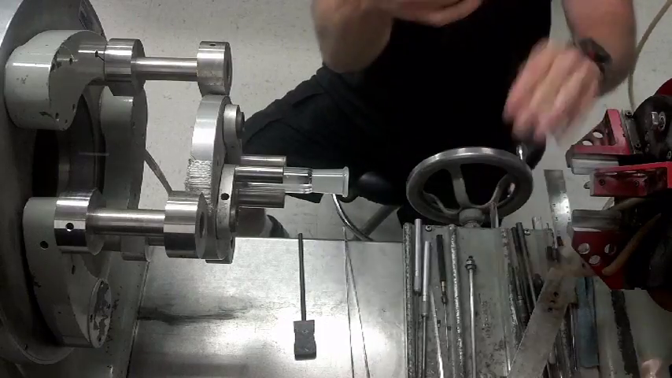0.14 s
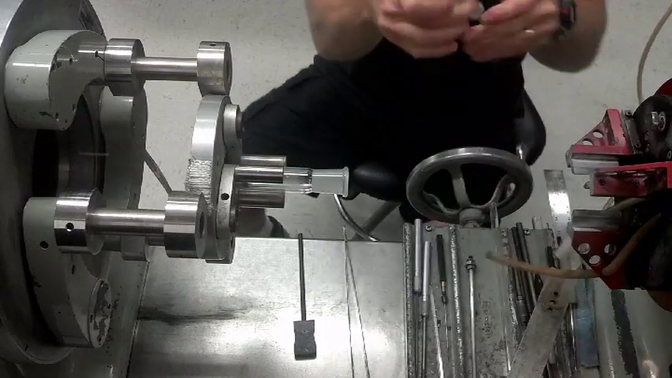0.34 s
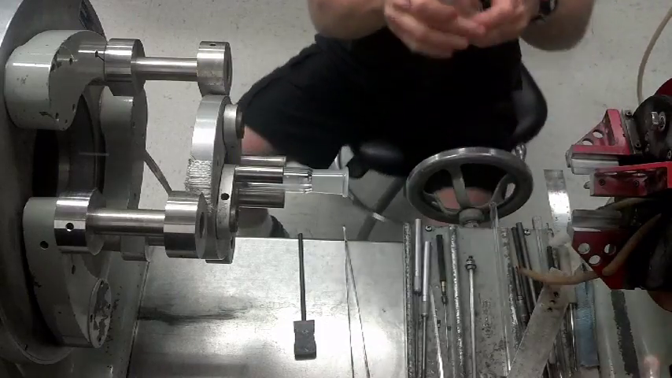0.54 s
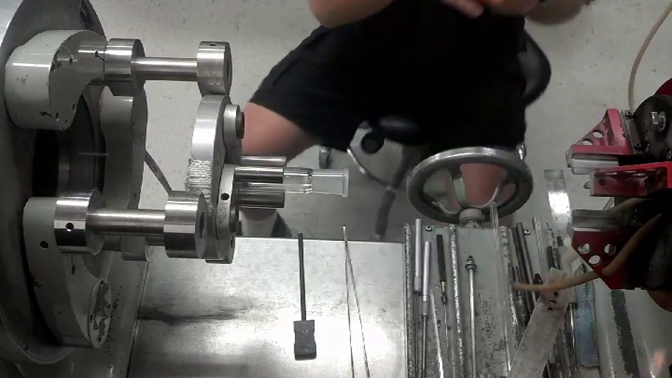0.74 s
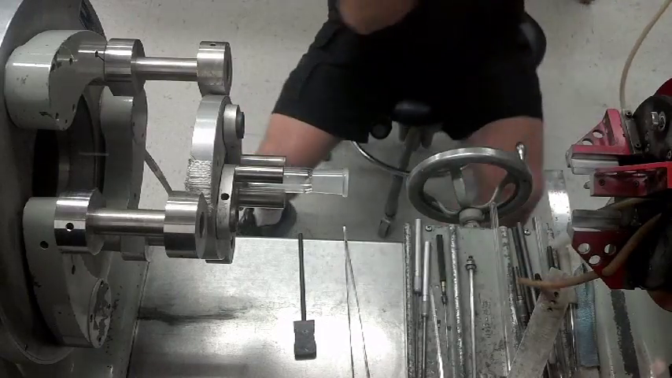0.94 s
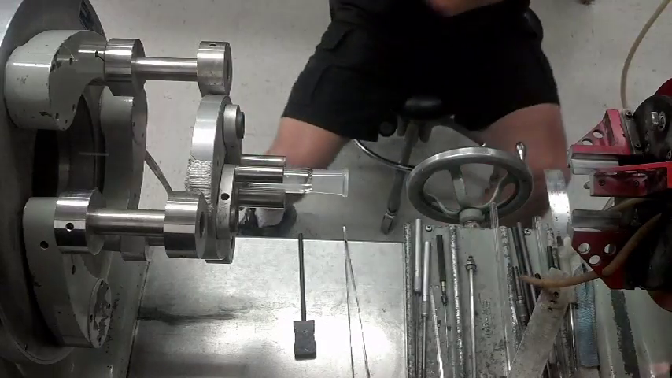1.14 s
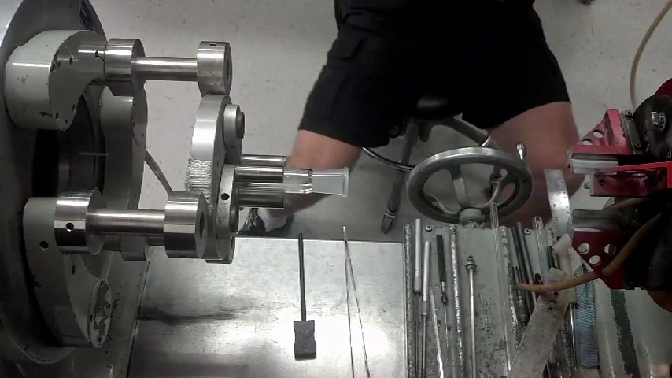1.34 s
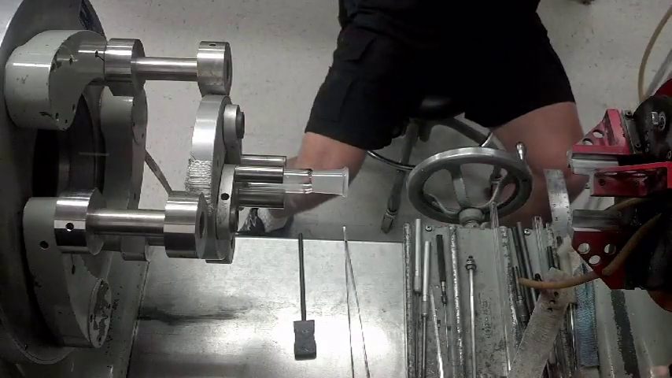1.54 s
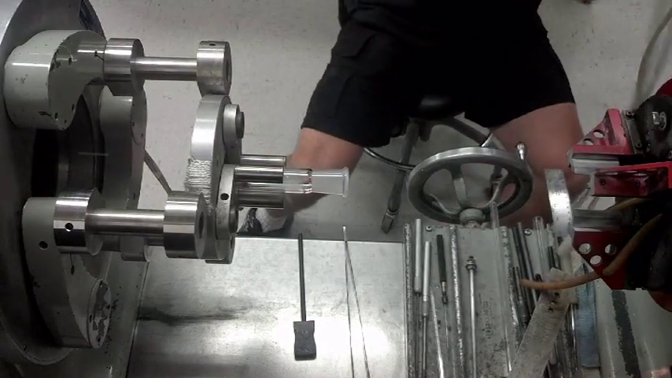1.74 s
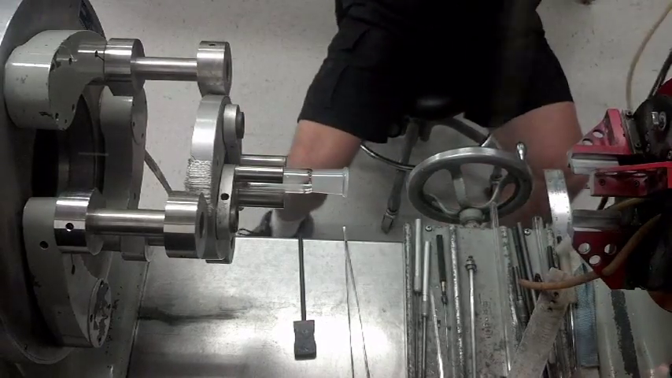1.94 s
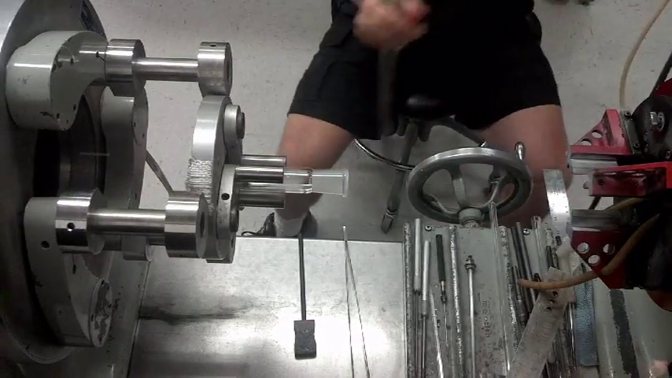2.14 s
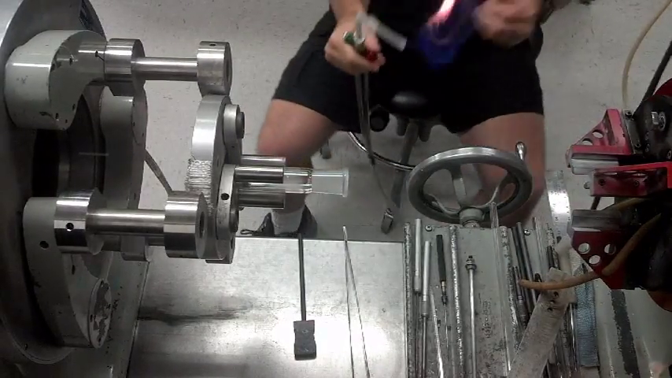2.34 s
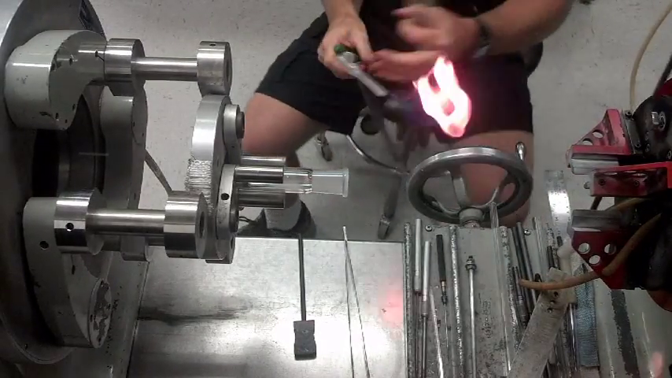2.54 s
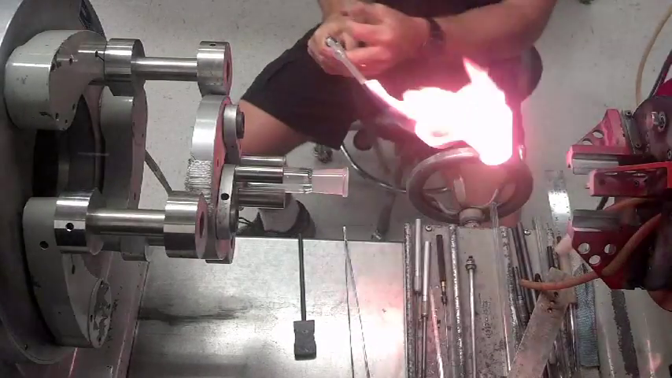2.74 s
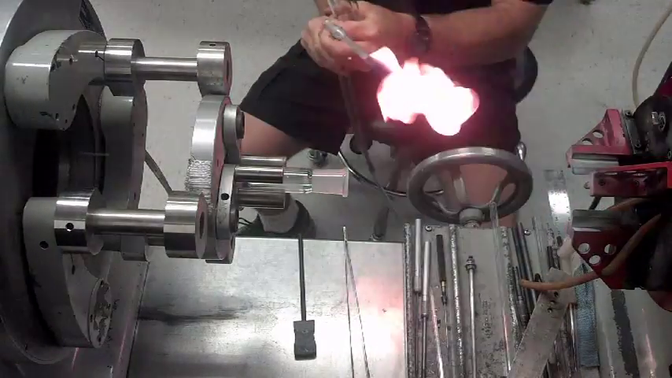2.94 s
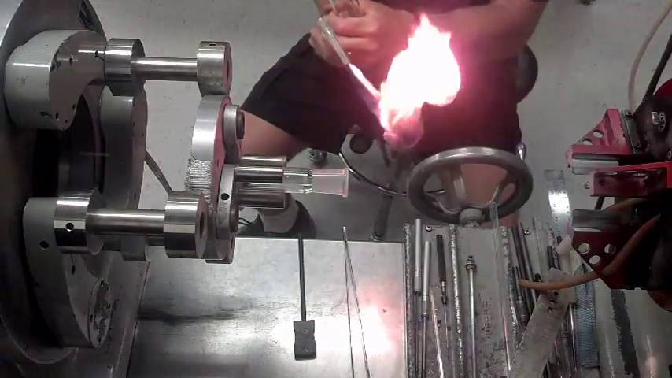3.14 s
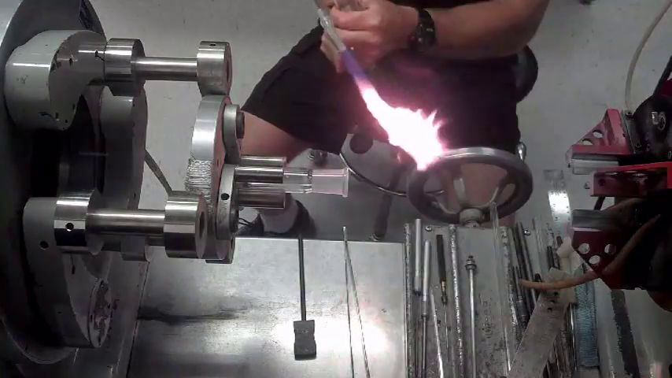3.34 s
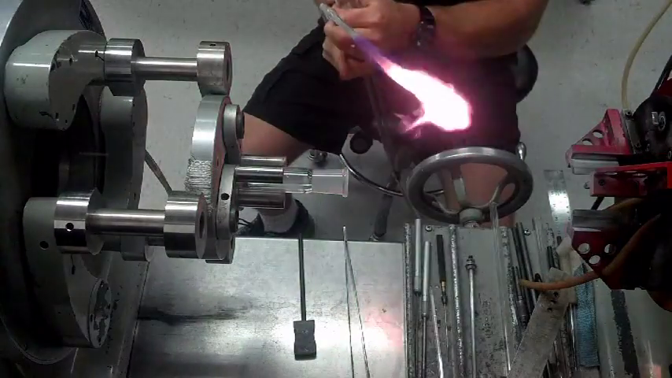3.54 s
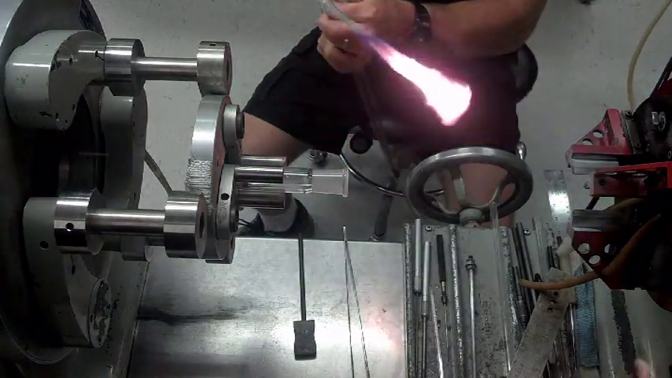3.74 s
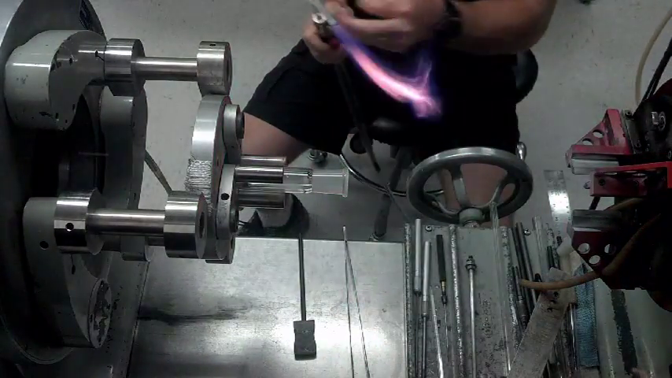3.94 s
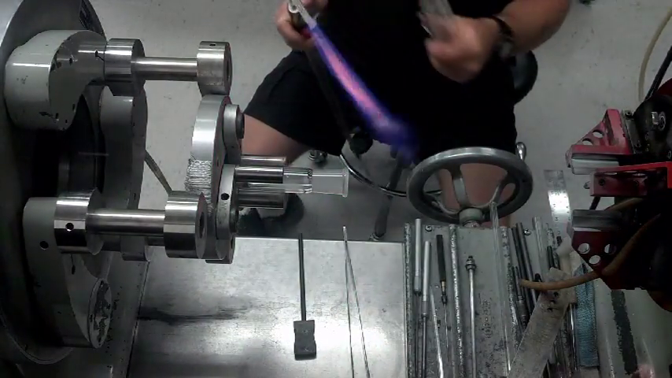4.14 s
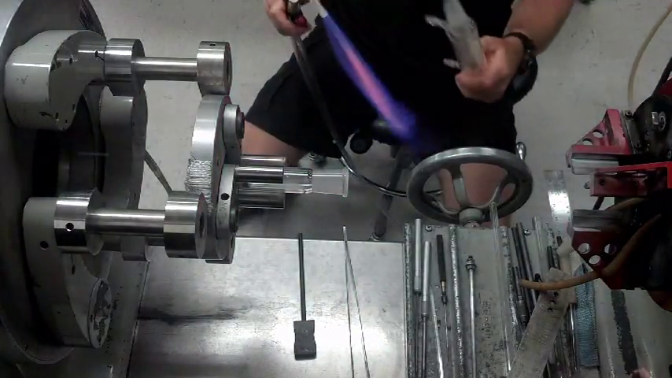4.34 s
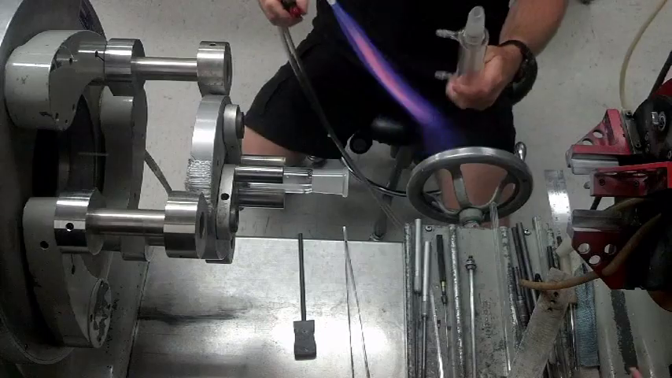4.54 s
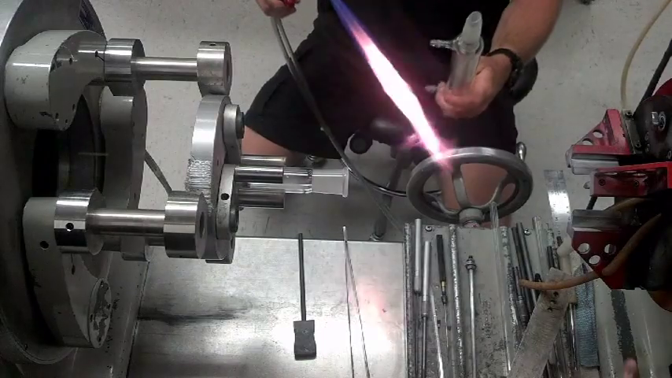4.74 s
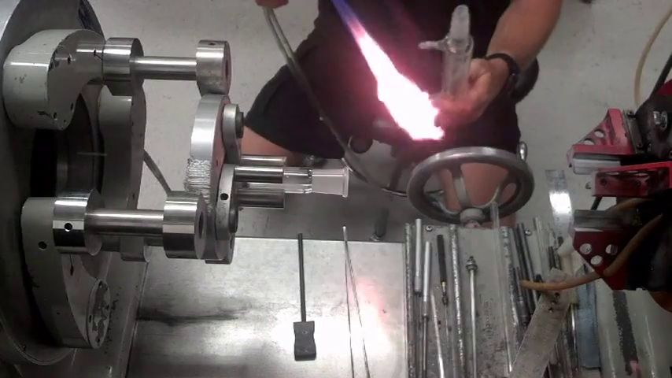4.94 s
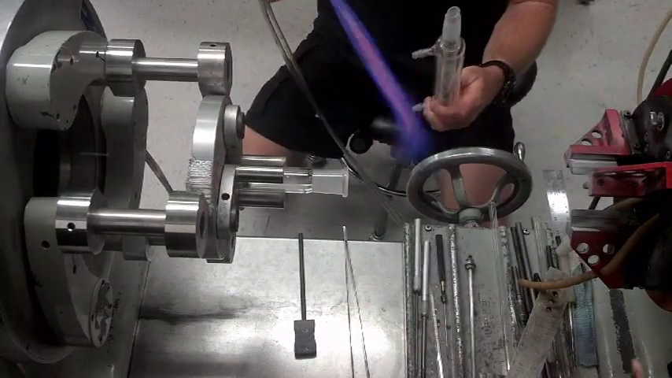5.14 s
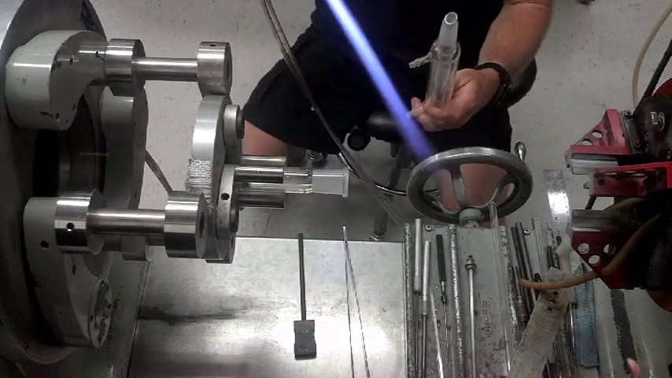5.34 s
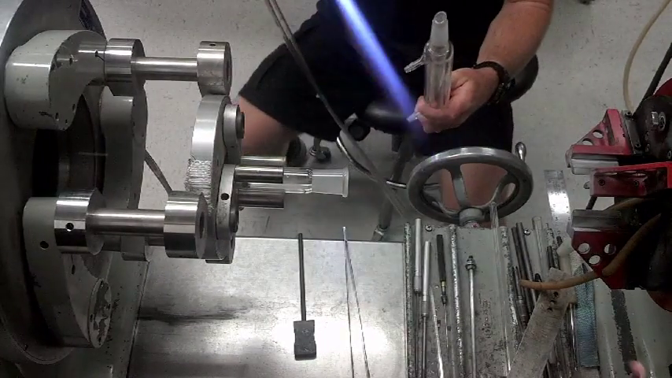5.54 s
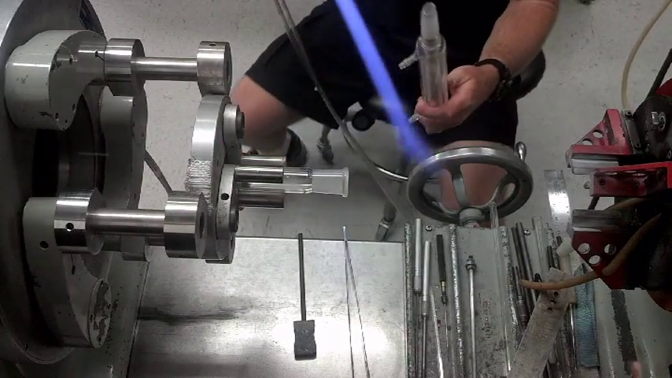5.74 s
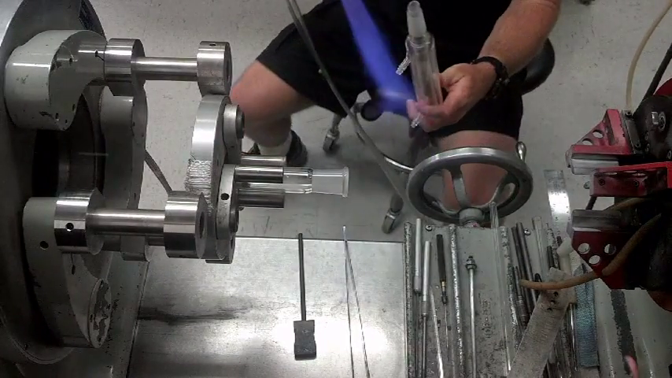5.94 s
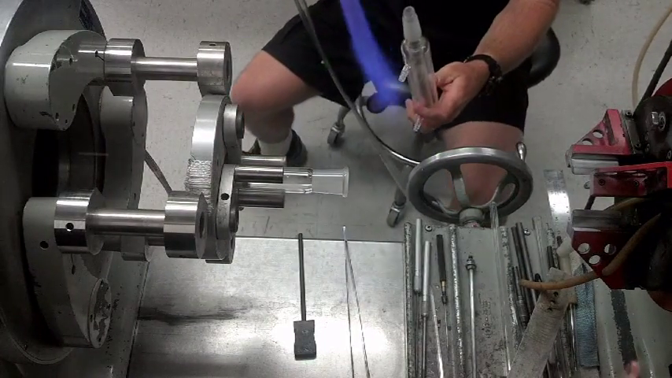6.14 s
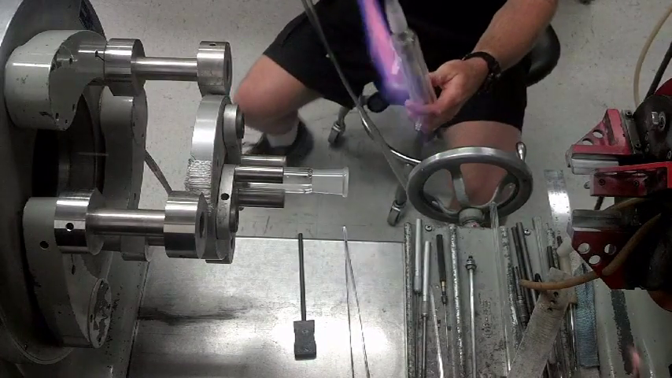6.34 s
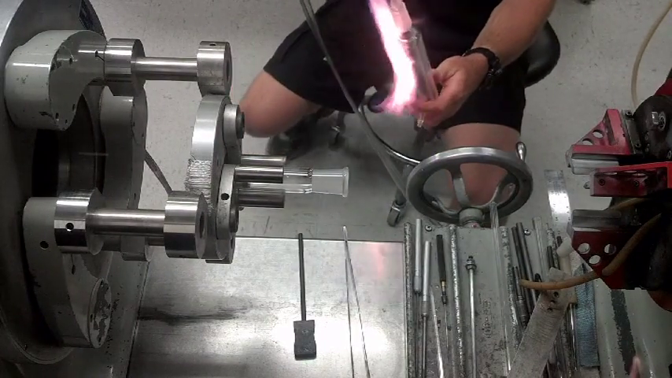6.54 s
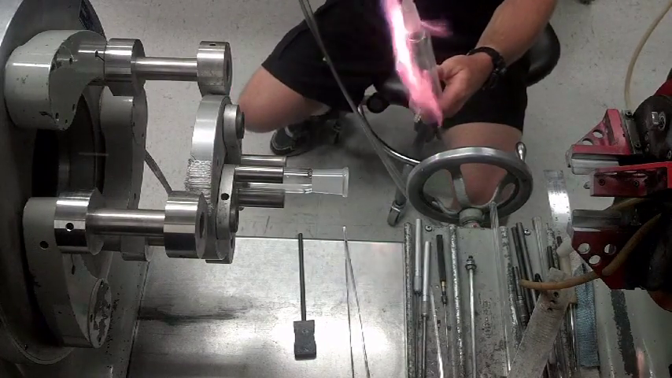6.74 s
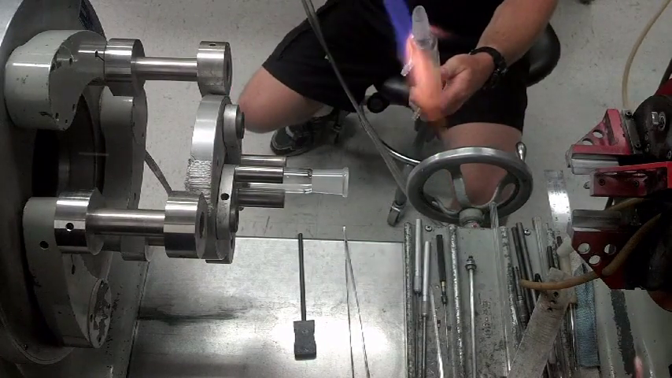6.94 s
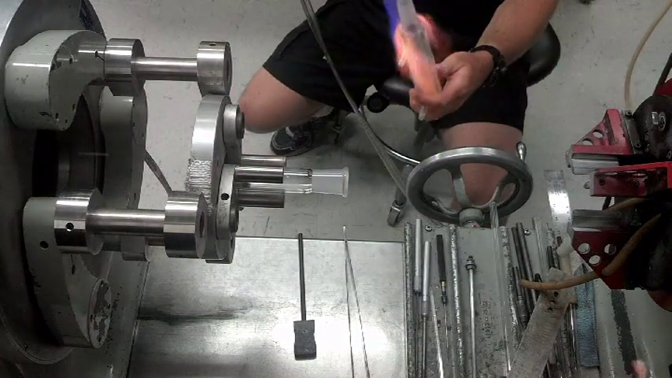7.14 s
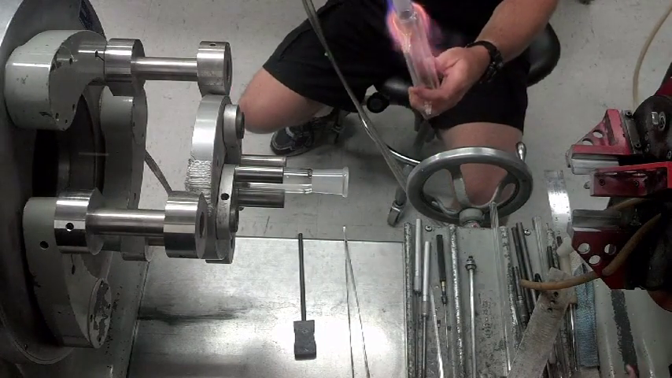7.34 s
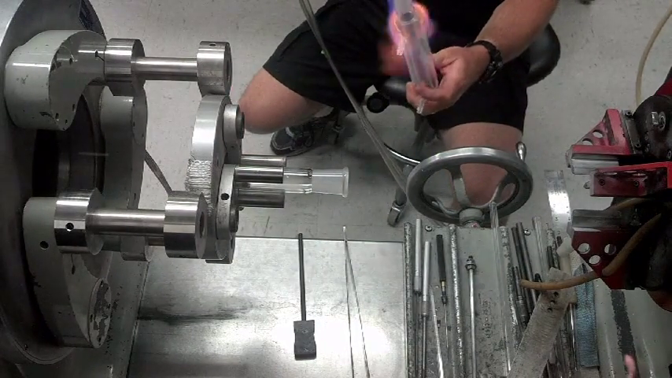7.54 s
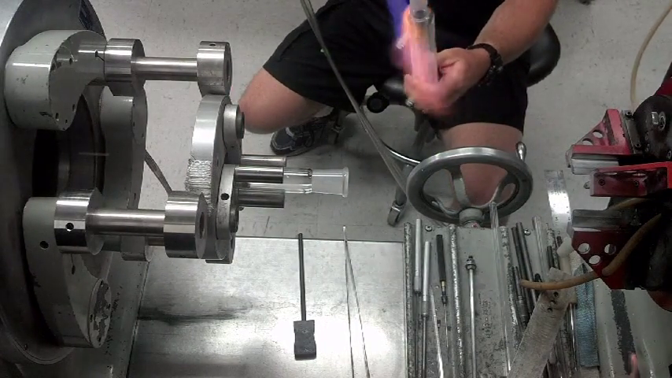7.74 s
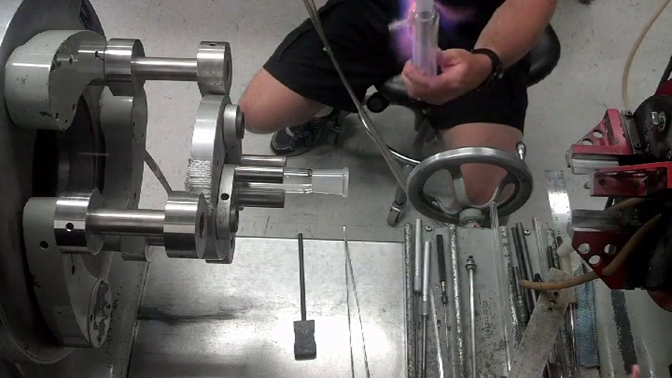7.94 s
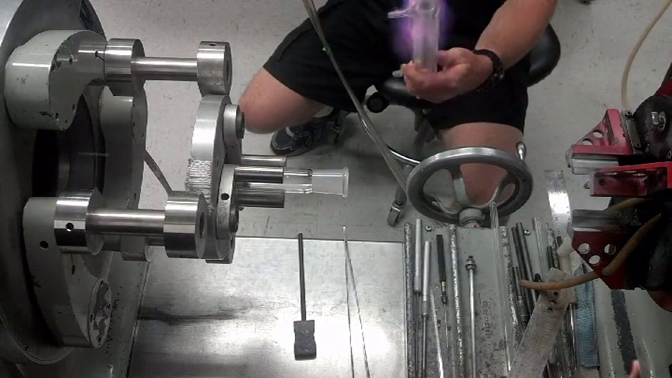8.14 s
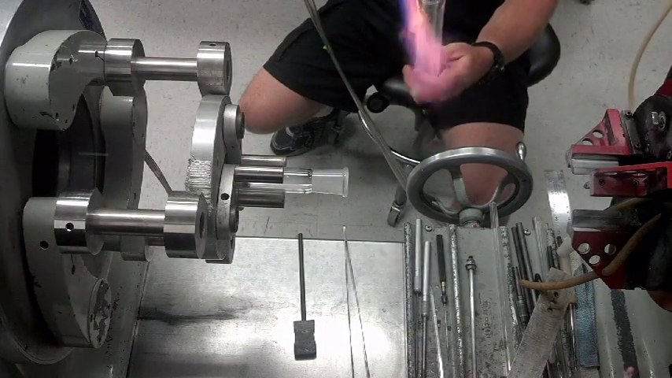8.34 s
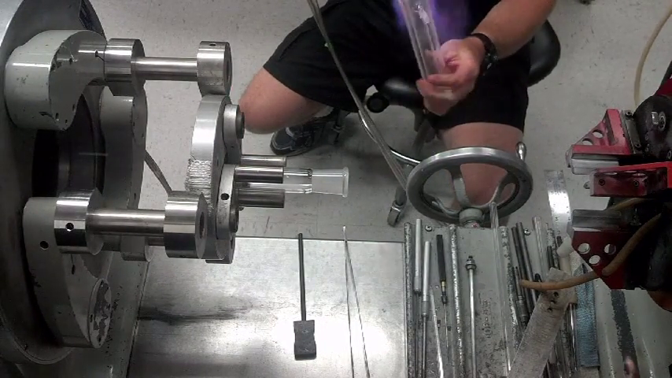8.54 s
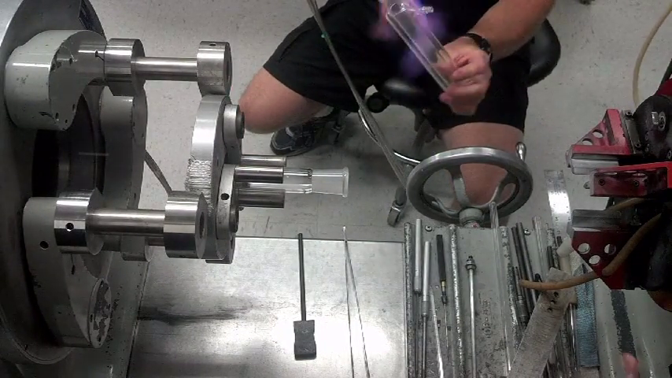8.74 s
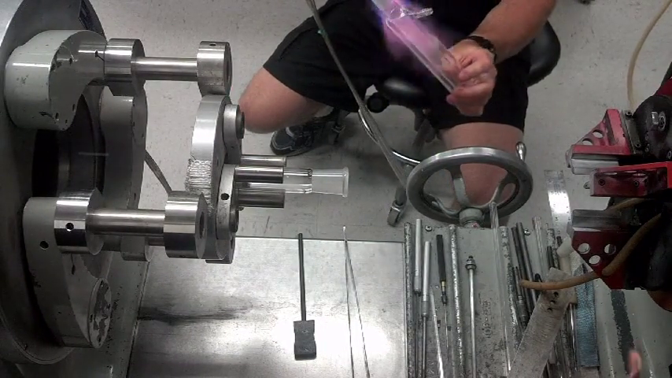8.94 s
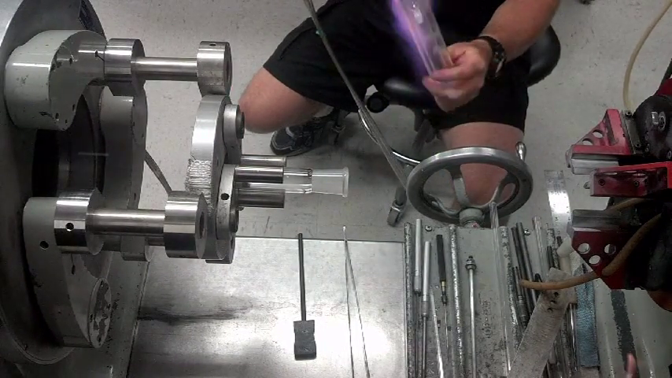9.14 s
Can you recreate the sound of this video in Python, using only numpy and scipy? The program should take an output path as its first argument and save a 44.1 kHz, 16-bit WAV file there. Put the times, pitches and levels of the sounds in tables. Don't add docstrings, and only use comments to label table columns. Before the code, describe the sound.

Workshop heard through a close stereo pair: low duct air and a wide, sharp gas-line hiss throughout. The torch is only a faint pilot flame at first, with light bench taps. Its oxygen is cracked open, then swells into a short puff ending in a sharp valve knock. The jet surges, the flame turns onto glass and roars low and resonant, while the hiss dips slightly and soft thuds land near the end.

```python
import sys
import numpy as np
from scipy import signal
from scipy.fft import rfft, irfft
from scipy.io import wavfile

SR = 44100
rng = np.random.default_rng(int(sys.argv[2]) if len(sys.argv) > 2 else 0)


def master(y):
    cut = np.clip(np.atleast_2d(y).T, -1, 1)
    pcm = np.round(cut * 32767)
    wavfile.write(sys.argv[1], SR, pcm.astype(np.int16))


def voltage_ratio(level):
    return 10 ** (np.asarray(level, float) / 20)


N = 409248
TIME = np.arange(N) / SR
HZ = np.maximum(np.fft.rfftfreq(N, 1 / SR), 1)
LEFT_RIGHT = np.array([[1], [-1]])


def torch():
    # start in seconds, glide in seconds, roar level in dB, jet level in dB.
    torch_moves = [
        (0.0, .1, -44, -49),
        (3.2, 0.35, -38, -53),
        (4.9, 0.2, -32.5, -40.5),
        (5.2, .35, -42, -40),
        (5.7, 0.043, -30.5, -35.5),
        (5.9, .75, -33, -51),
        (6.72, 0.2, -31, -38.5),
        (7.7, .3, -29.5, -40),
    ]
    # frequency in Hz, density in dB per Hz.
    roar_colour = [(40, -50), (100, -15), (200, -4.5), (350, 1), (550, -0.5), (800, -8), (1200, -12.5),
                   (2000, -25)]
    jet_colour = [(150, -45), (500, -34), (1000, 1), (1500, -0.5), (2200, 0.5), (3200, -4), (5000, -25.5)]
    puff_colour = [(80, -45), (300, -17), (800, -4), (1800, -4), (2700, 3), (4200, -3.5), (5300, 0),
                   (8000, -20)]
    # frequency in Hz, width in Hz, boost in dB.
    tube_modes = [(337, 49, 5), (379.6, 39, 7.5), (453, 23, -3.5), (477, 21, 4), (570, 40, 1),
                  (607, 30, 4.5), (675, 73, 2), (744, 55, 6.5), (1020, 36, -2.5)]
    roar_db, jet_db = glide_settings(torch_moves)
    flutter = drift(13)
    roar = voltage_ratio(roar_db + 0.62 * flutter) * turbulence(roar_colour, tube_modes)
    rush = voltage_ratio(jet_db + 1.4 * flutter) * turbulence(jet_colour)
    puff = puff_gain() * turbulence(puff_colour)
    return roar + rush + puff


def glide_settings(moves):
    start, _, *levels = moves[0]
    rows = [(start, *levels)]
    for start, glide, *new_levels in moves[1:]:
        rows.append((max(start, rows[-1][0]), *levels))
        rows.append((start + glide, *new_levels))
        levels = new_levels
    seconds, *columns = np.transpose(rows)
    return [np.interp(TIME, seconds, column) for column in columns]


def puff_gain():
    t = TIME - 5.176
    swell_db_per_s, trail_db_per_s = 130, 300
    seat_rise_s, seat_fall_s = 0.011, 0.0058
    swell = voltage_ratio(-29.5 - np.abs(t) * np.where(t < 0, swell_db_per_s, trail_db_per_s))
    spike = np.exp(-(t / np.where(t < 0, seat_rise_s, seat_fall_s)) ** 2)
    return swell + voltage_ratio(-27) * spike


def gas_line():
    # frequency in Hz, density in dB per Hz.
    hiss_colour = [(300, -58), (900, -8.5), (1800, -11.5), (2500, -6), (3000, 1), (3700, -4), (5000, 2),
                   (6200, 0), (7200, -1), (8300, -1.5), (9500, -3), (11000, -5.5), (12700, -4.5),
                   (13500, -7)]
    # frequency in Hz, width in Hz, boost in dB.
    nozzle_modes = [(3563, 76, 5.8), (3962, 120, 6.5), (4410, 82, 3.7), (4740, 30, 1.6), (5114, 94, 5.7),
                    (6140, 35, 2.1), (7040, 68, 2.7), (7600, 100, 4.2), (8800, 73, 2.5), (10740, 68, 2.4)]
    # delay in ms, left gain, right gain (both linear).
    bench_echoes = [(.4, 0.039, 0.16), (.55, 0.088, 0.1), (1.3, 0.067, 0.019), (2.15, 0.068, 0.07),
                    (2.4, 0.12, 0.013), (2.85, 0.083, 0.051), (4.17, 0.12, 0.21), (4.85, 0.098, 0.13),
                    (5.7, 0.1, 0.041), (6.9, 0.093, 0.35), (8.5, 0.13, 0.04), (9.7, 0.15, 0.061)]
    unsteady = voltage_ratio(0.086 * drift(2.2) + 0.69 * drift(19))
    jet = turbulence(hiss_colour, nozzle_modes, lead_ms=0.2905) * unsteady
    heard = jet.copy()
    for ms, left, right in bench_echoes:
        echo = np.roll(jet, round(ms * SR / 1000), axis=1) * [[left], [right]]
        heard += echo * (1 + 0.59 * drift(0.4))
    return voltage_ratio(gas_pressure_db()) * rms_one(heard)


def gas_pressure_db():
    draw_s, sag_db, sag_kept, recover_s = 7, 2.2, 0.4, 0.35
    backup_s, backup_width_s, backup_db = 5.62, 0.19, 1.2
    since = np.maximum(TIME - draw_s, 0)
    onset = np.minimum(since / 0.15, 1)
    sag = onset * (sag_kept + (1 - sag_kept) * np.exp(-since / recover_s))
    backup = np.exp(-((TIME - backup_s) / backup_width_s) ** 2)
    return -27.5 - sag_db * sag + backup_db * backup


def knocks():
    # start in seconds, ring in Hz, peak level in dB, T60 in seconds, left-right difference in dB.
    bench_contacts = [
        (.335, 1110, -28, 0.05, 0),
        (1.302, 1156, -33, .14, -8),
        (1.306, 2190, -41, 0.1, -4),
        (5.178, 650, -17, .035, 1),
        (5.1785, 300, -18, .04, 1),
        (5.725, 1900, -34, 0.055, 2),
        (6.445, 7500, -27.5, 0.1, -4),
        (7.96, 300, -22, 0.071, 0),
        (8.779, 365, -19, 0.14, 5),
    ]
    out, t = np.zeros((2, N)), np.arange(SR // 4) / SR
    for start, hz, peak_db, t60, pan_db in bench_contacts:
        ring = np.sin(2 * np.pi * hz * t) + 0.5 * np.sin(2 * np.pi * 0.93 * hz * t)
        attack = np.minimum(t / 0.0056, 1)
        ring *= voltage_ratio(peak_db - 60 * t / t60) * attack
        first = round(start * SR)
        out[:, first:first + len(t)] += ring * voltage_ratio(pan_db / 2 * LEFT_RIGHT)
    return out


def extraction_air():
    # frequency in Hz, density in dB per Hz.
    air_colour = [(25, -32), (48, -30), (58, -15), (80, -13), (92, -9.5), (160, 0), (230, -3), (300, -7),
                  (500, -4.5), (700, -6.5), (1000, -9), (1500, -17), (2200, -19.5), (3500, -55)]
    # frequency in Hz, width in Hz, boost in dB.
    duct_modes = [(93, 10, 3), (114, 11, 0.5), (126, 8.5, 6), (153.3, 14, 5), (178, 9.8, 5.5), (242, 28, 5),
                  (347, 34, -0.5), (385, 46, 5.5), (433, 19, -1.5), (476.5, 19.6, 8), (520, 18, 6.5),
                  (578, 21, -2.5), (656, 31, 4), (936, 31, -6), (1045, 28, 1)]
    return voltage_ratio(-31 + 0.5 * drift(3.1)) * turbulence(air_colour, duct_modes)


def walls(x):
    level_db, t60_s, low_hz = -11.5, 0.14, 700
    t = np.arange(SR // 5) / SR
    tails = rng.standard_normal((2, 2, len(t))) * voltage_ratio(-60 * t / t60_s) * (t > 0.004)
    tails = voltage_ratio(level_db) * tails / np.sqrt(np.sum(tails ** 2, axis=2, keepdims=True))
    bass_cut = 1 / (1 + (low_hz / HZ) ** 2)
    before, after = irfft(rfft(x) * rfft(tails, N) * bass_cut, N)
    turn = 2.93 * np.arange(N) / N + 0.4 * drift(0.32)
    return x + np.cos(turn) * before + np.sin(turn) * after


def turbulence(spectrum, modes=(), lead_ms=0):
    # frequency in Hz, likeness of the ports from 0 to 1, left-right level in dB.
    port_field = [(50, 0.5, 3), (90, 0.7, 9.5), (130, 1, 4.5), (175, 1, 3), (230, 0.94, 3),
                  (280, 0.78, -3.5), (397, 0.94, 1), (520, 0.86, -4.5), (675, 0.7, -3), (1000, 0.28, -5),
                  (1430, 0.19, 0.5), (2700, 0.02, -7), (5000, 0.03, 1.5), (12000, 0.26, -1)]
    level_db = at_hz(spectrum)
    for hz, width, boost_db in modes:
        level_db = level_db + boost_db / (1 + (2 * (HZ - hz) / width) ** 2)
    alike = np.clip(at_hz(port_field), 0, 1)
    shared, own = rfft(rng.standard_normal((2, N)))
    shared = shared * np.exp(1j * np.pi * LEFT_RIGHT * HZ * lead_ms / 1000)
    own_pair = np.array([own, np.roll(own, N // 7)])
    pair = np.sqrt(alike) * shared + np.sqrt(1 - alike) * own_pair
    return rms_one(irfft(pair * voltage_ratio(level_db + LEFT_RIGHT * at_hz(port_field, column=2) / 2), N))


def drift(rate):
    r = np.exp(-80 * np.pi * rate / SR)
    slow = signal.lfilter([1], [1, -2 * r, r * r], rng.standard_normal(N // 40 + 4002))[4000:]
    return np.interp(np.arange(N) / 40, np.arange(len(slow)), rms_one(slow - slow.mean()))


def at_hz(rows, column=1):
    rows = np.array(rows)
    return np.interp(np.log(HZ), np.log(rows[:, 0]), rows[:, column])


def rms_one(x):
    return x / np.sqrt(np.mean(x ** 2) + 1e-20)


def scene():
    return walls(torch() + gas_line() + knocks() + extraction_air())


def band_limit(x):
    return signal.sosfilt(signal.butter(12, 14470, fs=SR, output="sos"), x)


def record(dry):
    # frequency in Hz, left share, right share, lag in ms.
    far_port = [(60, .75, .75, .37), (175, .66, .8, .37), (260, .72, .72, .37), (800, .68, .78, .37),
                (1400, .5, .85, .37), (2700, .75, 1.05, .374), (4100, .7, 1.05, .369),
                (5500, .4, .85, .363), (9000, .3, .8, .363), (13000, .15, .55, .363)]
    left, right = rfft(dry)
    lag = np.exp(-2j * np.pi * HZ * at_hz(far_port, column=3) / 1000)
    left_beam = left - at_hz(far_port) * lag * right
    right_beam = right - at_hz(far_port, column=2) * lag * left
    top_cut = 1 / (1 + (HZ / 13590) ** 400)
    beams = irfft(top_cut * np.array([left_beam, right_beam]), N)
    below_70_hz = signal.butter(4, 70, fs=SR, output="sos")
    self_noise = signal.sosfilt(below_70_hz, rng.standard_normal((2, N)))
    return band_limit(beams + voltage_ratio(-61) * rms_one(self_noise))


dry = scene()
out = record(dry)
master(out)
```